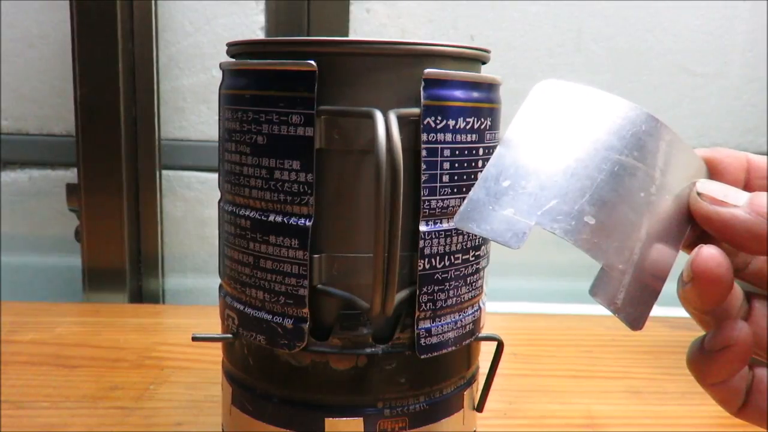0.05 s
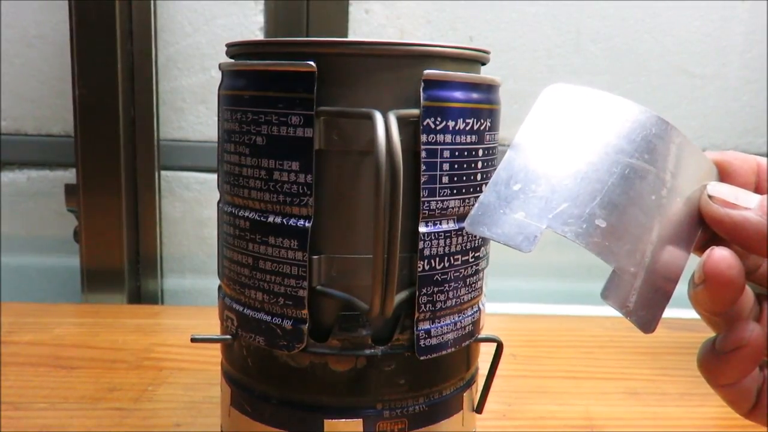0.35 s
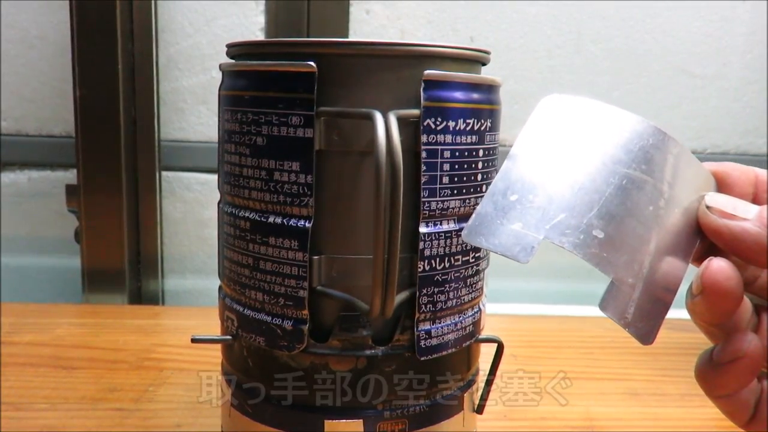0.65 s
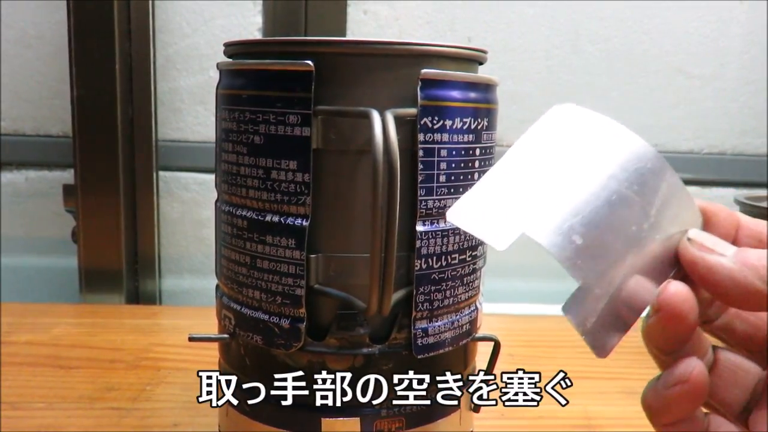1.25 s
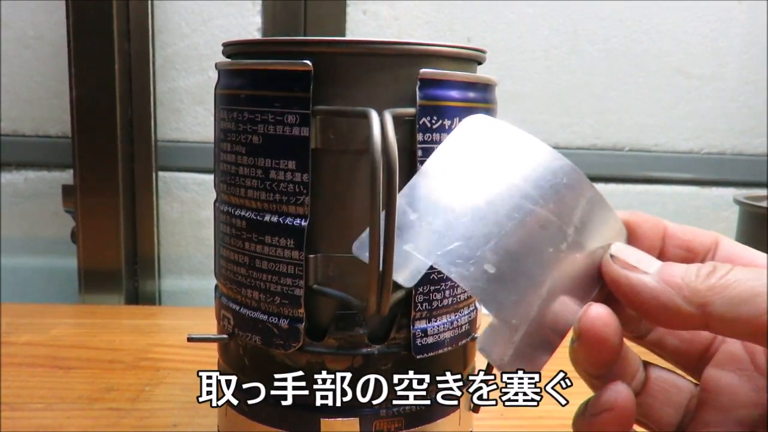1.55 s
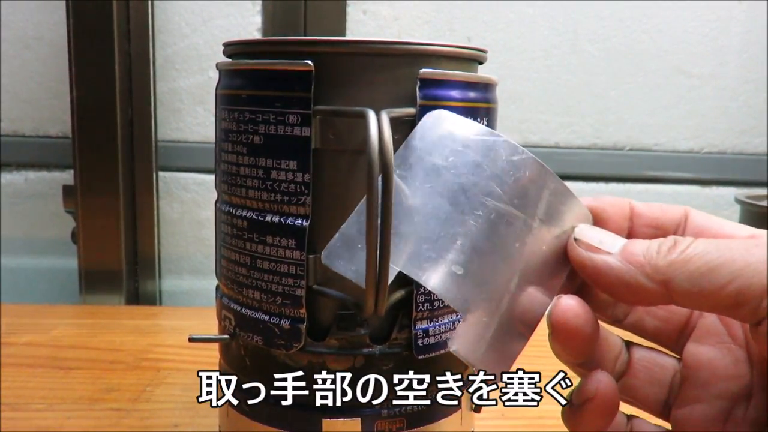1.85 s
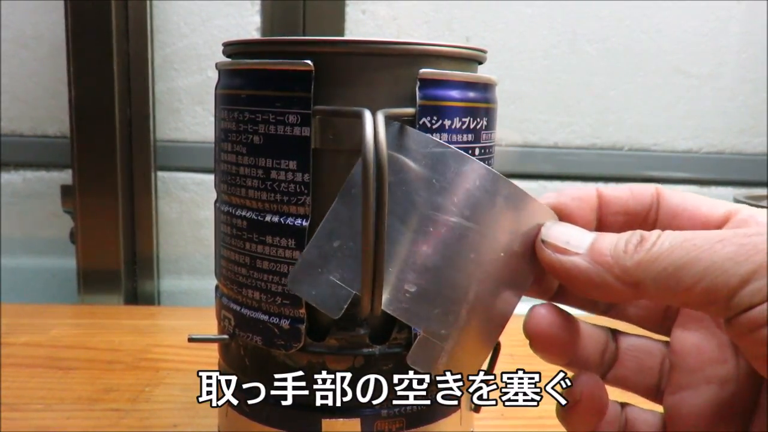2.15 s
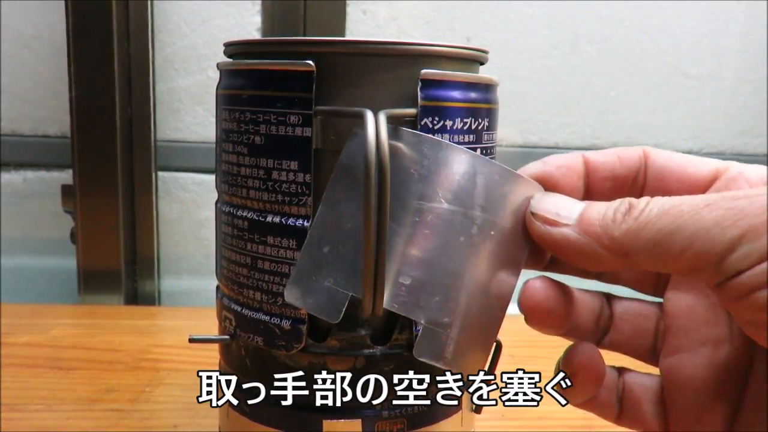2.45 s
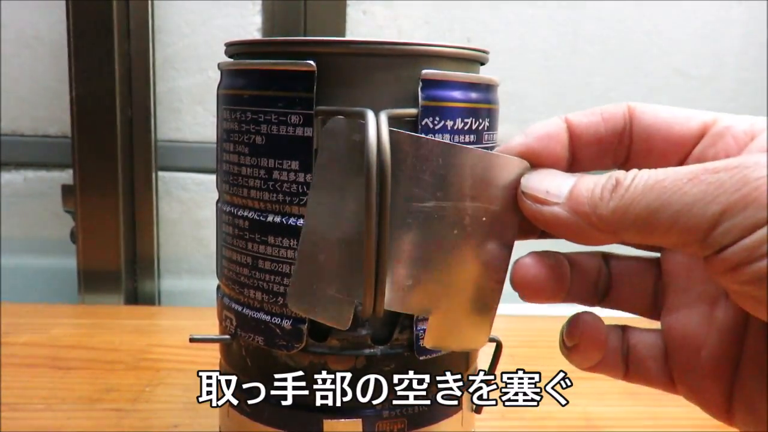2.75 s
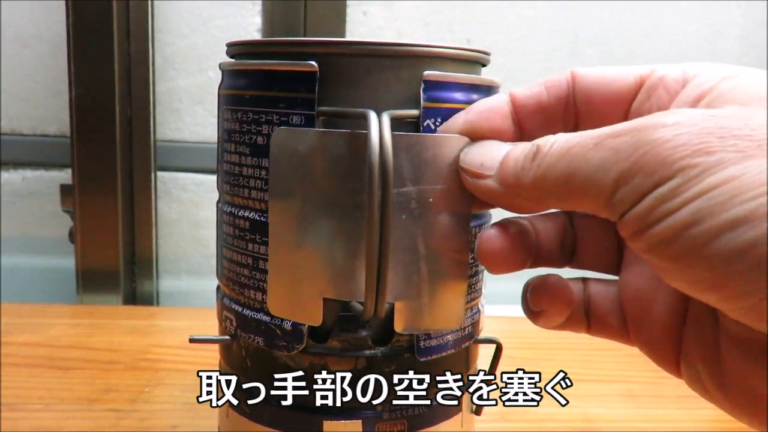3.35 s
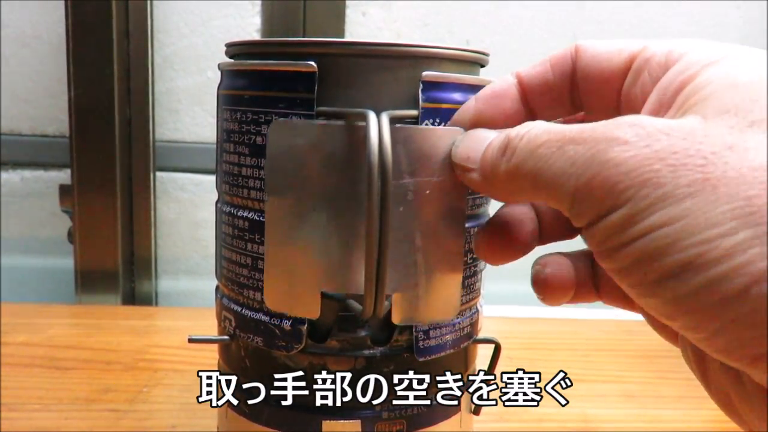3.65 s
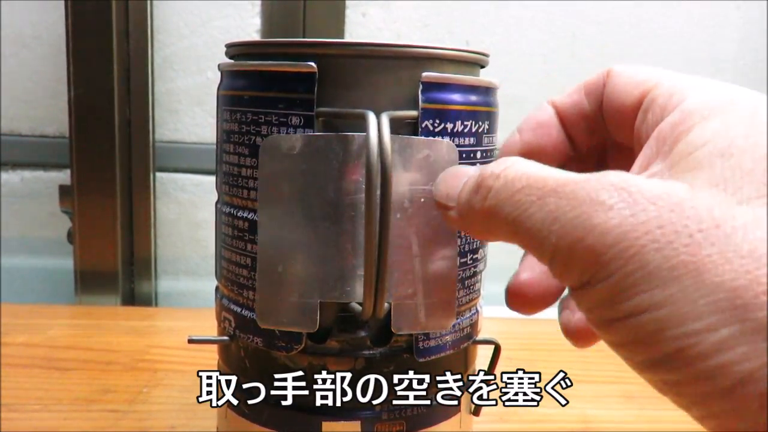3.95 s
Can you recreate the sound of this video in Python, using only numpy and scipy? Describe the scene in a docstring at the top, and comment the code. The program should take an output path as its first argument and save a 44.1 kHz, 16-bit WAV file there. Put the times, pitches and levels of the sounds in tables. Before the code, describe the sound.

A thin metal sheet scrapes and clinks as it slides behind the wire handle of a small can stove. Faint handling comes first, then tinny knocks, brief squeaks and a final snap, close up in a quiet room.

```python
"""Thin, tinny knocks and scrapes, close to the microphone in a quiet room: a metal sheet is slid
behind the wire handle of a small can stove on a table. Each knock is one click, each scrape a
stream of tiny slips, and both ring the same thin metal. Now and then the edge catches on a burr
or squeaks on one mode, and near the end the sheet snaps into place.
Faint handling sounds come first; room tone with a mains hum lies underneath."""
import sys
import numpy as np
from scipy import signal
from scipy.fft import rfft, irfft, next_fast_len
from scipy.io import wavfile
from scipy.ndimage import uniform_filter1d

SR = 44100
rng = np.random.default_rng(int(sys.argv[2]) if len(sys.argv) > 2 else 0)


def to_wav(sig):
    """Store sig (one row per channel, or 1-D mono) as 16-bit WAV at the path in sys.argv[1].

    Samples outside -1..1 are clipped; the rate is SR.
    """
    pcm = np.clip(np.atleast_2d(sig), -1, 1) * 32767
    pcm = np.round(pcm).astype(np.int16)
    wavfile.write(sys.argv[1], SR, pcm.T)  # frames by channels


N = 176400

# bass, middle, upper middle and treble bands: (low edge [Hz], high edge [Hz])
BANDS = [(30, 1200), (1200, 3100), (3100, 4800), (4800, 17000)]
# broad colour of the thin metal under its modes: (frequency [Hz], gain [dB])
METAL_COLOUR = [(40, -31.5), (130, -16), (280, -2.5), (450, -1), (600, 0.5), (1030, 6), (1350, -4.5),
                (2200, 2), (4000, 1), (4800, -1), (9000, -5.5), (15000, -9.5), (16100, -23)]
CLICK_S = 0.0048  # a click carries the energy of its level held for this long
CUTOFF_HZ = 16000


def knocks():
    """The sheet knocks faintly in the hand, then on can and handle; hard contacts are brighter."""
    # (time [s], bass [dB], middle [dB], upper middle [dB], treble [dB],
    #  lower favoured mode [Hz], upper favoured mode [Hz], their lift [dB])
    contacts = [(0.246, -49.5, -56, -57, -63, 1580, 4400, 4),
                (1.044, -72, -52.5, -52, -59.5, 3030, 3660, 10), (1.723, -30, -29, -34, -34, 1940, 4640, 7),
                (1.739, -31, -34, -30, -39, 2440, 4460, 13), (1.799, -34.5, -26, -34, -32.5, 2440, 4200, 9),
                (2.18, -23.5, -19, -17.5, -21, 2470, 3240, 2),
                (2.209, -33.5, -29.5, -35, -51, 1750, 4360, 6),
                (2.393, -46.5, -38, -39, -44, 1800, 3800, 7),
                (2.727, -33.5, -32, -32, -35, 2580, 3580, 13.5), (2.917, -44, -41, -46, -56, 2620, 4400, 6),
                (2.966, -31, -26.5, -31.5, -42, 2530, 4360, 15),
                (3.179, -30, -25, -26, -47, 2690, 4124, 21.5),
                (3.272, -26, -23.5, -24, -40.5, 2710, 4420, 13),
                (3.461, -32.5, -23, -28, -29, 2310, 3730, 15),
                (3.538, -38.5, -28, -27, -33, 3024, 3380, 20.5),
                (3.654, -22.5, -17.5, -21.5, -25, 1960, 4290, 6.5),
                (3.752, -28.5, -20.5, -25, -22.5, 2650, 3780, 18),
                (3.779, -13.5, -11.5, -10, -12.5, 1980, 4380, 8.5),
                (3.785, -25, -15, -27, -19, 2900, 4330, 10)]
    # every knock also thumps the table and sounds the hollow of the can: (frequency [Hz], lift [dB])
    table_and_can = [(150, 9.5), (725, 5)]
    trim_db, microphone_delay_s = -1, 0.0018
    out = np.zeros((2, N))
    for s, *band_db, lower_hz, upper_hz, lift_db in contacts:
        force = amp(np.add(band_db, trim_db)) * np.sqrt(CLICK_S * SR)
        favoured = table_and_can + [(lower_hz, lift_db), (upper_hz, lift_db)]
        add(out, s + microphone_delay_s, np.tensordot(force, metal(s, favoured), 1))
    return out


def scrapes():
    """The sliding edge makes a juddering stream of tiny slips, each ringing the metal."""
    # one list per stroke along the can: (time [s], bass [dB], middle [dB], upper middle [dB], treble [dB])
    strokes = [
        [(1.75, -36.5, -50, -51, -46), (1.77, -34, -58, -65, -65), (1.786, -40, -36, -33, -40),
         (1.802, -23, -32.5, -33, -36), (1.812, -52, -30, -33, -33.5), (1.828, -36.5, -52, -45, -50),
         (1.848, -38, -43.5, -46, -47), (1.95, -48, -53, -55, -56.5)],
        [(1.95, -46, -44, -56, -52.5), (1.995, -40, -29.5, -31, -37.5), (2.004, -44, -41, -31, -50),
         (2.02, -39, -41, -52, -45), (2.056, -30, -28, -22.5, -32.5), (2.08, -31, -37.5, -34, -38.5),
         (2.128, -35, -31.5, -34.5, -31), (2.154, -37.5, -42, -43, -55), (2.176, -48, -41, -41, -41)],
        [(2.4, -42.5, -43, -42, -47), (2.472, -46.5, -43.5, -49.5, -52.5), (2.512, -41, -39.5, -39.5, -44),
         (2.532, -39.5, -39.5, -41, -45.5), (2.56, -49, -43, -43, -46), (2.578, -45, -45.5, -42.5, -48),
         (2.644, -48.5, -54.5, -58.5, -66), (2.666, -41, -65, -57, -56), (2.69, -60, -51, -66, -73)],
        [(2.707, -37.5, -38, -44, -53), (2.732, -37, -39, -47, -54), (2.753, -33, -33, -35, -42),
         (2.783, -33.5, -42, -39.5, -41), (2.823, -42.5, -38, -37, -40), (2.851, -35, -42, -43.5, -66),
         (2.883, -48.5, -84, -81, -94), (2.91, -49, -61, -62, -69)],
        [(2.945, -40, -71, -70, -64), (2.957, -44, -33, -35, -43), (2.971, -35, -28, -35, -50),
         (2.979, -32, -36, -38, -49.5), (3.015, -48, -57, -53, -66), (3.035, -67, -51, -65, -64),
         (3.069, -36.5, -45, -53, -63), (3.15, -71, -61, -77, -72)],
        [(3.295, -32.5, -36, -33, -48), (3.349, -39.5, -48, -50, -58), (3.405, -37.5, -35, -40, -51),
         (3.429, -36, -39, -47, -54), (3.453, -36, -38, -38, -49), (3.465, -50, -45, -32.5, -36.5),
         (3.477, -41, -45, -50, -73), (3.489, -33.5, -39, -61, -65), (3.52, -59, -65, -62, -66)],
        [(3.83, -53, -57, -40, -36), (3.854, -27, -30.5, -27.5, -23), (3.884, -33, -26, -32, -31.5),
         (3.908, -40.5, -36.5, -36, -30), (3.948, -43, -49, -47, -40), (3.995, -82, -71, -51.5, -89)],
    ]
    # short nudges between the knocks, same columns
    nudges = [
        [(2.21, -30, -35, -34, -45), (2.23, -63, -41, -36.5, -50), (2.26, -79, -74, -70, -53.5)],
        [(3.555, -32, -44, -48, -47), (3.599, -58, -52, -52, -53), (3.648, -47, -52, -46, -45)],
        [(3.722, -35.5, -38, -42, -38), (3.746, -30, -39, -46, -41), (3.75, -40, -38, -18, -24)],
        [(3.76, -40, -24, -41, -34), (3.774, -34, -37, -30, -25.5)],
    ]
    # trim on those levels: (bass [dB], middle [dB], upper middle [dB], treble [dB])
    band_trims = [-3, -1.5, -1.96, -2.36]
    slips_per_s, spread_db, judder_db, fade_s = 2200, 5, 2, 0.003
    out = np.zeros((2, N))
    for stroke in strokes + nudges:
        times, *levels = np.transpose(stroke)
        t = np.arange(times[0] - fade_s, times[-1] + fade_s, 1 / SR)
        n = len(t)
        slips = (rng.random(n) < slips_per_s / SR) * rng.choice([-1, 1], n)
        strength = amp(spread_db * np.minimum(rng.exponential(1, n), 4))
        judder = amp(judder_db * wander(n, span_s=0.0021))
        fade = np.minimum(np.minimum(t - t[0], t[-1] - t) / fade_s, 1)
        friction = unit(slips * strength * judder) * fade
        for band, level_db, trim_db in zip(metal(times.mean()), levels, band_trims):
            force = friction * amp(np.interp(t, times, level_db) + trim_db)
            add(out, t[0], signal.fftconvolve(band, [force], axes=1))
    return out


def catches():
    """A burr snags the edge for an instant: a gritty click that rings mostly one mode."""
    # (time [s], favoured mode [Hz], level in that mode's band [dB])
    snags = [(2.001, 715, -28.5), (2.434, 3630, -40), (2.504, 1790, -37), (2.792, 4240, -43),
             (2.817, 4300, -31), (2.845, 2500, -31.5)]
    spill_db, lift_db = -12, 10.5
    out = np.zeros((2, N))
    for s, hz, db in snags:
        band_db = [db if low <= hz < high else db + spill_db for low, high in BANDS]
        force = amp(band_db) * np.sqrt(CLICK_S * SR)
        add(out, s, np.tensordot(force, metal(s, [(hz, lift_db)]), 1))
    return out


def squeaks():
    """Slips lock to one mode: a rough, wavering tone swells and fades, dead centre."""
    # the edge sings: (centre time [s], half length [s], pitch [Hz], level at the crest [dB])
    squeals = [(1.795, .025, 4220, -39), (2.054, .016, 4380, -28), (2.066, .03, 2545, -32),
               (2.076, .022, 865, -21), (2.094, .014, 850, -28), (2.76, .06, 845, -35),
               (2.815, .05, 4470, -39), (3.072, .04, 830, -40), (3.365, .1, 846, -39),
               (3.395, .025, 1840, -37), (3.39, .16, 2590, -37), (3.452, .035, 1850, -31),
               (3.452, .03, 2580, -34), (3.472, .03, 2420, -33), (3.478, .035, 850, -34)]
    wobble_share, wobble_s, flutter_db = 0.0078, 0.0034, 3
    out = np.zeros((2, N))
    for s, half_s, hz, db in squeals:
        n = int(2 * half_s * SR)
        turns = np.cumsum(hz * (1 + wobble_share * wander(n, wobble_s))) / SR
        flutter = amp(flutter_db * wander(n, wobble_s))
        tone = unit(np.sin(2 * np.pi * turns) * flutter)
        add(out[:1], s - half_s, (amp(db) * np.hanning(n) ** 2 * tone)[None])
    return out


def metal(s, favoured=()):
    """Metal and room answer a click at time s: bands of equal energy x (mid, side) x samples."""
    # crowded, quickly dying modes of the thin metal: (frequency [Hz], width [Hz], lift [dB])
    clusters = [(298.3, 53, 12.5), (374, 60, 5), (701, 223, 14), (832.7, 91, 17.5), (1821, 140, 14),
                (2575, 270, 5.5), (2860, 110, 9), (3094, 310, 6), (4390, 260, 3.5), (5020, 220, 8),
                (6120, 130, 13), (6650, 610, 6.5)]
    # clear, longer modes of can and handle, and above 5 kHz of the thin sheet: (frequency [Hz], relative level
    # [dB], t60 [s])
    clear_modes = [(308.4, -21, 0.19), (698, -9, 0.15), (800, -7, 0.15), (846, -2.5, 0.21),
                   (1840, -6, 0.09), (2148, -10, .12), (2330, -8, 0.21), (2594, 1, 0.15), (2876, -7, 0.19),
                   (3811, -13, 0.22), (4330, -1, 0.06), (4475, -4, 0.1), (5680, -7, 0.09),
                   (6990, -12, 0.15), (9010, -14, 0.15), (10340, -14, 0.13), (12550, -14, 0.12)]
    # the tone shifts along the way: (time [s], mode gain [dB], body gain [dB], sizzle gain [dB])
    coupling = [(1.75, -6, -13.5, -8), (2.15, -3.5, 3, -15), (2.55, -4, -0.5, -27), (3.0, 6, -0.5, -2),
                (3.4, 2.5, -1.5, -7), (3.8, -3, -2, 3)]
    # stereo width at the microphone: (frequency [Hz], side gain [dB])
    stereo_width = [(60, -16), (130, -40), (640, -92), (1410, -73.5), (3100, -14.5), (6820, -8),
                    (15000, -1.5)]
    clank_t60_s, rise_s = 0.039, 0.00018
    ring_db, sheen_db, room_db = -7.5, -8.5, -8
    body_below_hz, sizzle_above_hz = 870, 12200
    lift_width_hz = 116  # at 1 kHz; grows with the root of the frequency
    times, *columns = np.transpose(coupling)
    mode_db, body_db, sizzle_db = [np.interp(s, times, column) for column in columns]

    def gain_db(hz):
        """Spectrum of the clank; the spot that is hit favours some modes: (frequency [Hz], lift [dB])."""
        humps = sum(amp(db + mode_db) ** 2 / (1 + (2 * (hz - f) / width) ** 2) ** 2
                    for f, width, db in clusters)
        body = body_db / (1 + (hz / body_below_hz) ** 6)
        sizzle = sizzle_db * (1 - 1 / (1 + (hz / sizzle_above_hz) ** 12))
        lifts = sum(db * np.exp(-((hz - f) / lift_width_hz) ** 2 * 1000 / f) for f, db in favoured)
        return read(METAL_COLOUR, hz) + 10 * np.log10(1 + humps) + body + sizzle + lifts

    t = np.arange(16384) / SR
    attack = 1 - np.exp(-t / rise_s)
    clank = tint(rng.standard_normal((2, len(t))) * attack * amp(-60 * t / clank_t60_s), gain_db)
    ring = sum(amp(db - 60 * t / t60) * np.sin(2 * np.pi * (hz * t + rng.random((2, 1))))
               for hz, db, t60 in clear_modes)
    room = tint(room_tail(t), gain_db)
    ringing = amp(ring_db + mode_db) * unit(ring) + amp(sheen_db) * unit(sheen(t))
    mid, side = unit(clank) + attack * ringing + amp(room_db) * unit(room)
    pair = np.array([mid, tint(side, lambda hz: read(stereo_width, hz))])
    bands = [bandpass(pair, edges, order=6) for edges in BANDS]
    return np.array([band / np.linalg.norm(band[0]) for band in bands])


def sheen(t, mean_count=40, above_hz=4800, t60_s=0.1):
    """Fine treble modes of the sheet shift as it bends, so each contact rings a random handful."""
    hz = np.fft.rfftfreq(len(t), 1 / SR)
    treble = (hz > above_hz) & (hz < CUTOFF_HZ)
    picked = treble & (rng.random(len(hz)) < mean_count / treble.sum())
    real, imag = rng.standard_normal((2, 2, len(hz)))
    spectrum = (real + 1j * imag) * picked * amp(read(METAL_COLOUR, hz))
    return irfft(spectrum, len(t)) * amp(-60 * t / t60_s)


def room_tail(t, rise_s=0.0017):
    """The room's reflections build up quickly and die away at a rate set by frequency."""
    # reverberation time: (frequency [Hz], t60 [s])
    decay_times = [(150, 0.2), (700, 0.27), (2000, 0.24), (5000, 0.16), (14000, 0.2)]
    hz, times, spectra = signal.stft(rng.standard_normal((2, len(t))), SR, nperseg=256)
    decay = amp(-60 * times / read(decay_times, hz)[:, None])
    _, tail = signal.istft(spectra * decay, SR, nperseg=256)
    return tail[:, :len(t)] * (1 - np.exp(-t / rise_s))


def handling():
    """A faint low ring follows the first soft knock; later the hand moves in with a dull rustle."""
    ring_at_s, ring_hz, ring_db, ring_t60_s = 0.25, 402, -55.5, 0.45
    rustle_centre_s, rustle_length_s, rustle_db = 1.245, 0.16, -61.5
    out, t = np.zeros((2, N)), np.arange(SR // 2) / SR
    ring = amp(ring_db - 60 * t / ring_t60_s) * np.sin(2 * np.pi * ring_hz * t)
    add(out[:1], ring_at_s, ring[None])
    rustle = unit(bandpass(rng.standard_normal(len(t)), edges_hz=(350, 1600), order=2))
    swell = np.sin(np.pi * np.minimum(t / rustle_length_s, 1)) ** 2
    add(out[:1], rustle_centre_s - rustle_length_s / 2, (amp(rustle_db) * swell * rustle)[None])
    return out


def room_tone(noise_db=-60.3, hum_hz=49, hum_db=-81):
    """Steady noise of the quiet room around the microphone, with a faint mains hum in the centre."""
    # colour of the room noise: (frequency [Hz], gain [dB])
    colour = [(20, -16), (45, -29), (77, -15.5), (193, -9), (300, -4), (420, -2), (540, -7), (950, -4),
              (1500, -6.5), (3000, -12), (6000, -17), (10000, -25), (12500, -35), (16000, -52)]
    # its stereo width: (frequency [Hz], side minus mid [dB])
    stereo_width = [(60, -9), (180, -21), (550, -19), (1650, -2), (4970, 6), (15000, 10.5)]
    noise = tint(rng.standard_normal((2, N)), lambda hz: read(colour, hz))
    mid, side = amp(noise_db) * unit(noise)
    hum = amp(hum_db) * np.sqrt(2) * np.sin(2 * np.pi * hum_hz * np.arange(N) / SR)
    return np.array([mid + hum, tint(side, lambda hz: read(stereo_width, hz))])


def amp(db):
    """Decibels to amplitude."""
    return 10 ** (np.asarray(db) / 20)


def unit(x):
    """Scales to rms 1."""
    return x / np.sqrt(np.mean(x ** 2) + 1e-20)


def read(points, hz):
    """Reads a table on a log-frequency axis."""
    f, value = np.transpose(points)
    return np.interp(np.log(hz + 1), np.log(f + 1), value)


def add(mix, s, sound):
    """Mixes a sound in at time s."""
    part = mix[:, max(round(s * SR), 0):][:, :sound.shape[1]]
    part += sound[:, :part.shape[1]]


def wander(n, span_s):
    """Smooth random drift of rms 1."""
    size = max(int(span_s * SR), 2)
    return unit(uniform_filter1d(uniform_filter1d(rng.standard_normal(n), size), size))


def bandpass(x, edges_hz, order):
    """Keeps the band between two edges."""
    return signal.sosfilt(signal.butter(order, edges_hz, "band", fs=SR, output="sos"), x)


def tint(x, gain_db):
    """Causal filter whose gain is a function of frequency."""
    n = next_fast_len(2 * x.shape[-1])
    log_gain = np.log(amp(gain_db(abs(np.fft.fftfreq(n, 1 / SR)))))
    response = np.exp(np.conj(signal.hilbert(log_gain)))[:n // 2 + 1]
    return irfft(rfft(x, n) * response, n)[..., :x.shape[-1]]


def scene():
    """All sources at the microphone, turned from mid and side to left and right."""
    mid, side = knocks() + catches() + scrapes() + squeaks() + handling() + room_tone()
    return np.array([mid + side, mid - side])


def record(dry):
    """The recorder's band limit cuts the highest treble."""
    lowpass = signal.firwin(255, CUTOFF_HZ, window=("kaiser", 9), fs=SR)
    return signal.oaconvolve(dry, lowpass[None], "same")


dry = scene()
out = record(dry)
to_wav(out)
```